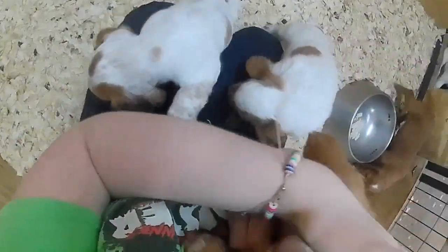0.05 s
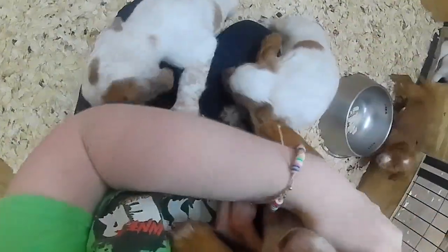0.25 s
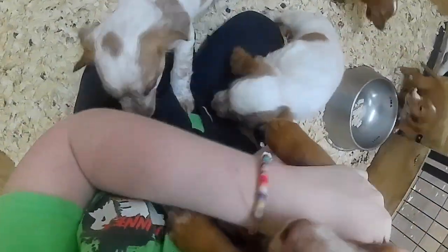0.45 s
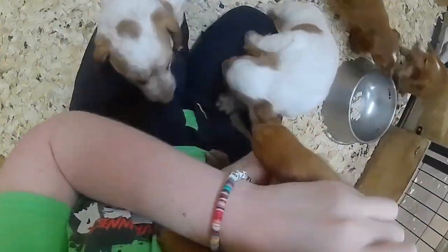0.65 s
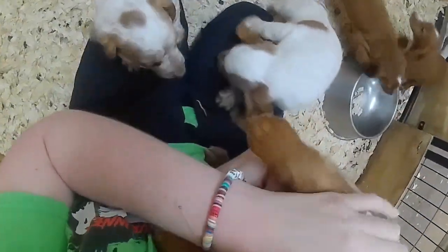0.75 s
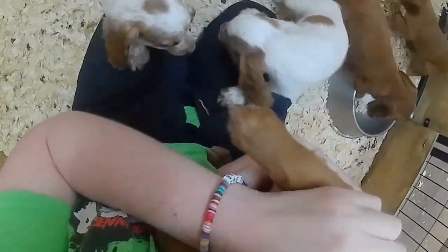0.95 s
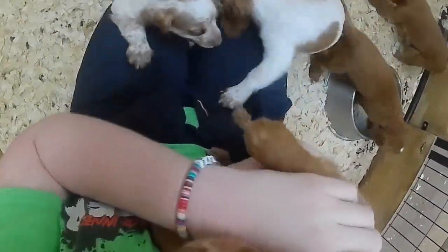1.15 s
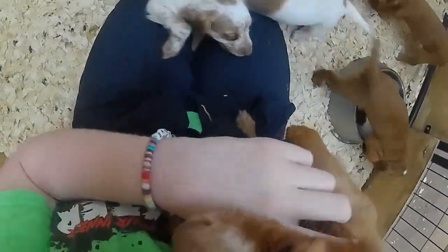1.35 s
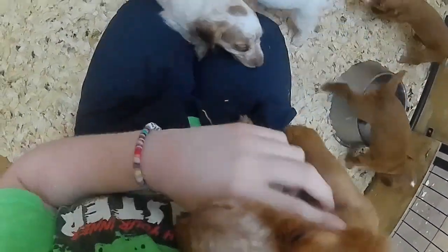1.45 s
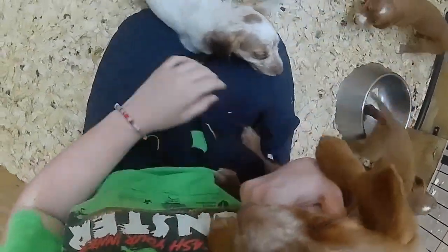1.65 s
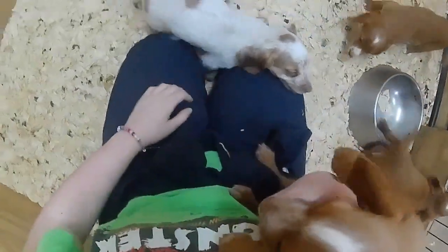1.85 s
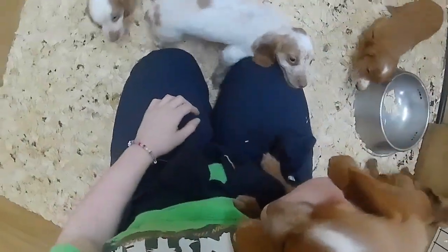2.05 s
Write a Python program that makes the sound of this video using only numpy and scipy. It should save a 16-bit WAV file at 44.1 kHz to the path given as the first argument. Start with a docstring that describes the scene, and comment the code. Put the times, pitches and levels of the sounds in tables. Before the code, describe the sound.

High-pitched puppy yelps burst out, overlapping and overloaded, after faint rustling and soft bumps in a pen

```python
"""A litter of puppies in a pen in a small hard room, heard by a close microphone that overloads.
A bright hiss dies away over rumble and room tone, with far whimpers, rustles, soft thuds, scuffs and
knocks on a metal bowl; after a quiet second several pups yip over one another, with a dull shuffle between.
Voices are gliding harmonic series with airflow noise, the bowl is a bank of decaying modes,
and the other sounds are shaped noise or enveloped low tones."""
import sys
import numpy as np
from scipy import signal
from scipy.fft import rfft, irfft
from scipy.io import wavfile
from scipy.ndimage import uniform_filter1d, minimum_filter1d

SR = 44100
rng = np.random.default_rng(int(sys.argv[2]) if len(sys.argv) > 2 else 0)


def rack_gain(trim_db):
    """Turn a fader trim in dB into the linear factor to multiply a signal by."""
    fader = np.asarray(trim_db, float)
    return 10 ** (fader / 20)


def to_wav(sig):
    """Store sig (one row per channel, or 1-D mono) as 16-bit WAV at the path in sys.argv[1].

    Samples outside -1..1 are clipped; the rate is SR.
    """
    pcm = np.clip(np.atleast_2d(sig), -1, 1) * 32767
    pcm = np.round(pcm).astype(np.int16)
    wavfile.write(sys.argv[1], SR, pcm.T)  # frames by channels


N = 92786


def rms_one(x):
    """Normalisation: scale to unit rms."""
    return x / np.sqrt(np.mean(x ** 2) + 1e-20)


def wobble(rate_hz, size):
    """Low-passed random process: two equal poles smooth white noise, rms 1."""
    r = np.exp(-2 * np.pi * rate_hz / SR)
    settle = 4000
    noise = rng.standard_normal(size + settle)
    return rms_one(signal.lfilter([1], [1, -2 * r, r * r], noise)[settle:])


def at_hz(spectrum, hz):
    """Spectral envelope: gain interpolated in dB over log frequency, -90 dB outside the table."""
    known, db = np.transpose(spectrum)
    return rack_gain(np.interp(np.log(hz), np.log(known), db, -90, -90))


def coloured(spectrum):
    """Spectral shaping: white noise weighted by an envelope, rms 1."""
    hz = np.maximum(np.fft.rfftfreq(N, 1 / SR), 1)
    return rms_one(irfft(rfft(rng.standard_normal(N)) * at_hz(spectrum, hz), N))


def decaying(strikes, t60_s):
    """Exponential decay: each strike falls by 60 dB in t60_s."""
    return signal.lfilter([1], [1, -rack_gain(-60 / (t60_s * SR))], strikes)


# Voiced calls, one row each: [(t/s, pitch f/Hz, effort level/dB), ...], source tilt [dB per octave],
# airflow noise level/dB, pitch jitter [share of the pitch]
CALLS = [ ([(.125, 988, -58), (.165, 1037, -40), (.195, 830, -51), (.24, 1000, -57)], -32, -23, 0.018),
         ([(.33, 1102, -62), (.37, 1098, -45), (.47, 1100, -49.5), (.51, 1000, -81)], -15, -38, 0.0016),
         ([(1.175, 705, -51.5), (1.235, 683, -42.5)], -58, -37, 0.057), ([(1.232, 1888, -84),
         (1.26, 1878, -19.5), (1.29, 1853, -11.5), (1.32, 1960, -9), (1.348, 1942, -8),
         (1.367, 1945, -16.5), (1.41, 1883, -46.5)], 0, -22, 0.017), ([(1.33, 2107, -23),
         (1.355, 2209, -14), (1.435, 2370, -40)], -40, -25, 0.023), ([(1.235, 634.7, -38),
         (1.26, 899.7, -23.5), (1.273, 1304, -7), (1.315, 1279, -17), (1.335, 1437, -4), (1.352, 1404, -25),
         (1.43, 1535, -40)], 0, -14.5, 0.032), ([(1.44, 750, -49), (1.48, 919, -32), (1.54, 903, -45)],
         -39.5, -16.5, 0.15), ([(1.543, 743.6, -54), (1.568, 900, -11), (1.625, 1047, -11.5),
         (1.67, 1080, -66)], -31, -14, 0.039), ([(1.57, 983, -29), (1.582, 1163, -11), (1.598, 1257, -10.5),
         (1.675, 1287, -21), (1.72, 1250, -65)], 0, -29, 0.023), ([(1.588, 1386, -16), (1.612, 1446, -9.5),
         (1.63, 1484, -3), (1.685, 1509, -14.5), (1.745, 1536, -38)], -1, -22.5, 0.0075),
         ([(1.655, 1550, -30), (1.69, 1925, -23), (1.74, 1808, -36)], -30, -35, 0.041),
         ([(1.745, 1215, -33.5), (1.798, 831.6, -21), (1.83, 871, -29.5)], -25, -51, 0.0094),
         ([(1.787, 1325, -16.5), (1.84, 1253, -15.5), (1.852, 1237, -10.5), (1.9, 1159, -5),
         (1.96, 1137, -32.5), (2.02, 1100, -70.5)], 0.41, -38, 0.007), ([(1.82, 1295, -35),
         (1.853, 1635, -15), (1.87, 1935, -16.5), (1.95, 2100, -25), (1.99, 2077, -49)], 0, -20, 0.0055),
         ([(1.885, 2250, -22.5), (1.935, 2640, -22), (1.975, 2570, -52)], -9, -3.5, 0.034), ]
# Resonance of throat and open mouth: f/Hz, level/dB
THROAT = [(600, -21), (1100, 7), (2050, 1.5), (3100, -17), (3550, -9), (4000, -14), (4250, -22),
          (6000, -35.5), (15500, -32.5)]
JITTER_HZ, SHIMMER_DB, SHIMMER_HZ = 150, 1.6, 83
FADE_S = .002                   # soft start and stop of each voice
HOARSE_RAD, HOARSE_HZ = .22, 250   # phase unrest added per overtone
SOFT_DULLS = .5                 # extra fall (dB per octave) per dB below the call's full effort


def puppies():
    """Source-filter principle: unsteady harmonics weighted by the throat, plus airflow noise."""
    out, air = np.zeros(N), coloured(THROAT)
    k = np.arange(1, 7)[:, None]   # harmonic numbers
    for rows, tilt_db, air_db, jitter in CALLS:
        s, hz, db = np.transpose(rows)
        i = np.arange(int(s[0] * SR), int(s[-1] * SR))
        t = i / SR
        glide = np.interp(t, s, hz)
        phase = 2 * np.pi * np.cumsum(glide * (1 + jitter * wobble(JITTER_HZ, N)[i])) / SR
        effort_db = np.interp(t, s, db)
        dull_db = SOFT_DULLS * (effort_db - max(db))
        shares = rack_gain((tilt_db + dull_db) * np.log2(k)) * at_hz(THROAT, k * glide)
        unrest = HOARSE_RAD * (k - 1) * np.array([wobble(HOARSE_HZ, len(i)) for _ in k])
        tone = np.sum(shares * np.sin(k * phase + unrest), axis=0)
        tone = tone / np.sqrt(np.sum(shares ** 2, axis=0))   # the throat alters timbre, not level
        effort = rack_gain(effort_db + SHIMMER_DB * wobble(SHIMMER_HZ, N)[i])
        fade = np.clip(np.minimum(t - s[0], s[-1] - t) / FADE_S, 0, 1)
        out[i] += fade * effort * (tone + rack_gain(air_db + dull_db / 2) * air[i])
    return out


SUM_TONES_DB, SUM_TONES_FROM_HZ = 5, 2600


def sum_tones(voices):
    """Quadratic intermodulation: squaring overlapping voices makes sums of their pitches; highs are kept."""
    hz = np.maximum(np.fft.rfftfreq(N, 1 / SR), 1)
    high_part = 1 / (1 + (SUM_TONES_FROM_HZ / hz) ** 10)
    return rack_gain(SUM_TONES_DB) * irfft(rfft(voices ** 2) * at_hz(THROAT, hz) * high_part, N)


ROOM_T60_S, ROOM_TREBLE_T60_S, ROOM_DB, ROOM_GAP_S = .36, .3, -4, .004


def room(x):
    """Diffuse reverberation: convolution with decaying noise whose treble dies first."""
    t = np.arange(SR // 2) / SR
    noise = rng.standard_normal(len(t))
    low = signal.sosfilt(signal.butter(2, 3000, fs=SR, output="sos"), noise)
    tail = low * rack_gain(-60 * t / ROOM_T60_S) + (noise - low) * rack_gain(-60 * t / ROOM_TREBLE_T60_S)
    tail = tail * (t > ROOM_GAP_S)
    tail = tail / np.sqrt(np.sum(rack_gain(-120 * t / ROOM_T60_S)))   # about unit energy
    return rack_gain(ROOM_DB) * signal.fftconvolve(x, tail)[:N]


# Knocks on the bowl: t/s, dull ring level/dB, bright edge level/dB
KNOCKS = [(.56, -64, -77), (.80, -60.5, -40.5), (.99, -58.5, -82), (1.595, -61, -88.5), (1.91, -61.5, -81)]
# Modes of the metal bowl: f/Hz, relative level/dB, decay time t60/s
BOWL_MODES = [(408, 19, 0.48), (1697, -14, 0.16), (2760, -7, 0.058), (3210, -1.5, 0.071), (4330, -4.5, 0.1),
              (5155, -6.5, 0.057), (5600, -10, .1), (6750, -8, 0.12)]
BRIGHT_FROM_HZ = 1000
RATTLES_PER_S, RATTLE_S = 600, .016   # the bowl chatters after a knock


def bowl():
    """Modal synthesis: a knock's weight rings the low modes, its edge and chatter the high ones."""
    s, ring_db, edge_db = np.transpose(KNOCKS)
    i, out = (s * SR).astype(int), np.zeros(N)
    spread_db = rng.normal(0, 1, (len(s), len(BOWL_MODES)))
    for (hz, db, t60), own_db in zip(BOWL_MODES, spread_db.T):
        bright = hz > BRIGHT_FROM_HZ
        clicks = np.full(N, 1e-18)
        clicks[i] = rack_gain((edge_db if bright else ring_db) + db + own_db)
        if bright:
            size = int(RATTLE_S * SR)
            hits = rng.random(size) < RATTLES_PER_S / SR
            chatter = rng.standard_normal(size) * hits * np.linspace(1, 0, size)
            clicks = np.convolve(clicks, chatter)[:N] + clicks / 2
        r, w = rack_gain(-60 / (t60 * SR)), 2 * np.pi * hz / SR
        out += signal.lfilter([0, np.sin(w)], [1, -2 * r * np.cos(w), r * r], clicks)
    return out


# Low thuds of pups tumbling: t/s, level/dB
THUDS = [(0.244, -30), (0.408, -28), (.635, -26), (0.798, -30.5), (1.672, -27.5), (1.77, -33.5)]
THUD_HZ, THUD_S = 61.8, 0.064


def thuds():
    """Amplitude envelope: low tones, each slightly detuned, swell and fade over half a sine."""
    t, out = np.arange(N) / SR, np.zeros(N)
    for (s, db), (bend, turn) in zip(THUDS, rng.normal(0, 1, (len(THUDS), 2))):
        swell = np.sin(np.pi * np.clip((t - s) / THUD_S, 0, 1))
        out += rack_gain(db) * swell * np.sin(2 * np.pi * THUD_HZ * (1 + .08 * bend) * t + turn)
    return out


SHUFFLE_S, SHUFFLE_LENGTH_S, SHUFFLE_DB, SHUFFLE_HZ = 1.401, 0.18, -40.5, (148, 750)


def shuffle():
    """Band-limited friction noise: one dull rub swells and fades between two yips."""
    band = signal.butter(2, SHUFFLE_HZ, "band", fs=SR, output="sos")
    rub = rms_one(signal.sosfilt(band, rng.standard_normal(N)))
    swell = np.sin(np.pi * np.clip((np.arange(N) / SR - SHUFFLE_S) / SHUFFLE_LENGTH_S, 0, 1))
    return rack_gain(SHUFFLE_DB) * swell * rub


# Short bright scuffs of claws: t/s, level/dB
SCUFFS = [(.632, -59), (.80, -46), (1.192, -55)]
# Spectrum of bright noise, shared by scuffs, rustles and hiss: f/Hz, relative level/dB per Hz
HISS_COLOUR = [(1760, -52), (3000, -15.5), (5560, -6.5), (11400, -10), (15500, -19)]
SCUFF_T60_S = 0.29


def scuffs():
    """Friction noise: bright noise set off at each scuff decays exponentially."""
    s, db = np.transpose(SCUFFS)
    strikes = np.full(N, 1e-18)
    strikes[(s * SR).astype(int)] = rack_gain(db)
    return coloured(HISS_COLOUR) * decaying(strikes, SCUFF_T60_S)


RUSTLES_PER_S, RUSTLE_DB, RUSTLE_T60_S = 54, -68.5, 0.035


def bedding():
    """Random point process: tiny bursts of bright noise, paws rustling in shavings."""
    happens = rng.random(N) < RUSTLES_PER_S / SR
    sizes = rack_gain(2.9 * np.minimum(rng.exponential(1, N), 4)) * happens
    return rack_gain(RUSTLE_DB) * coloured(HISS_COLOUR) * decaying(sizes + 1e-18, RUSTLE_T60_S)


# The bright hiss dying away: t/s, level/dB
HISS = [(0, -47), (.12, -49.5), (.24, -72)]


def hiss():
    """Enveloped broadband noise: bright hiss fades along the table, silent after its last row."""
    s, db = np.transpose(HISS)
    return rack_gain(np.interp(np.arange(N) / SR, s, db, right=-120)) * coloured(HISS_COLOUR)


# Spectrum of the rumble: f/Hz, relative level/dB per Hz
RUMBLE_COLOUR = [(27, -2), (60, -3.5), (85, -6.5), (140, -27.5)]
RUMBLE_DB = -40.5


def rumble():
    """Stationary noise: steady low-frequency rumble."""
    return rack_gain(RUMBLE_DB) * coloured(RUMBLE_COLOUR)


# Spectrum of the room tone: f/Hz, relative level/dB per Hz
ROOM_TONE = [(65, -25), (110, -3.5), (422, -15.5), (639, -20), (6760, -38.5), (15500, -41.5)]
ROOM_TONE_DB = -49.5


def room_tone():
    """Stationary noise: steady background falling towards the treble."""
    return rack_gain(ROOM_TONE_DB) * coloured(ROOM_TONE)


CHEST_CUT_HZ = 520   # small bodies radiate little below this


def scene():
    """Superposition: voices and their reverberation add to the pen's noises and the background."""
    voices = puppies()
    chest = signal.butter(4, CHEST_CUT_HZ, "high", fs=SR, output="sos")
    voices = signal.sosfilt(chest, voices + sum_tones(voices))
    pen = bowl() + thuds() + shuffle() + scuffs() + bedding()
    background = hiss() + rumble() + room_tone()
    return (voices + room(voices) + pen + background)[None]


def low_pass(x):
    """Removes everything above the highest recorded frequency."""
    return signal.sosfilt(signal.butter(12, 15620, fs=SR, output="sos"), x)


LIMIT, LIMITER_S = 1.08, .006
OVERLOAD, OFFSET = .99, .0104   # clipping level and constant offset, full scale 1


def record(dry):
    """Amplitude limiting: a fast limiter holds the peaks, then the offset signal clips."""
    span = int(LIMITER_S * SR)
    needed = np.minimum(1, LIMIT / (np.abs(dry) + 1e-9))
    gain = uniform_filter1d(minimum_filter1d(needed, span), span)
    mix = np.clip(gain * dry + OFFSET, -OVERLOAD, OVERLOAD)
    return low_pass(mix)


dry = scene()
out = record(dry)
to_wav(out)
```